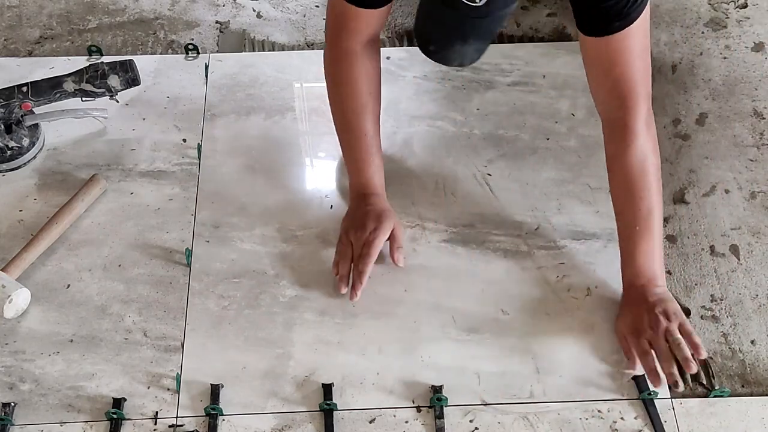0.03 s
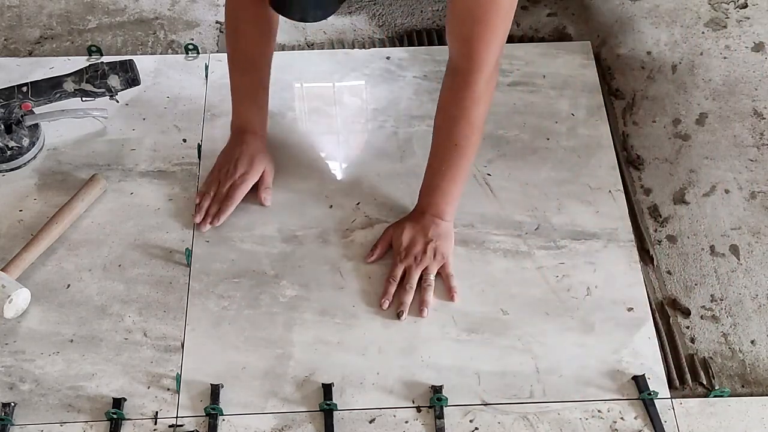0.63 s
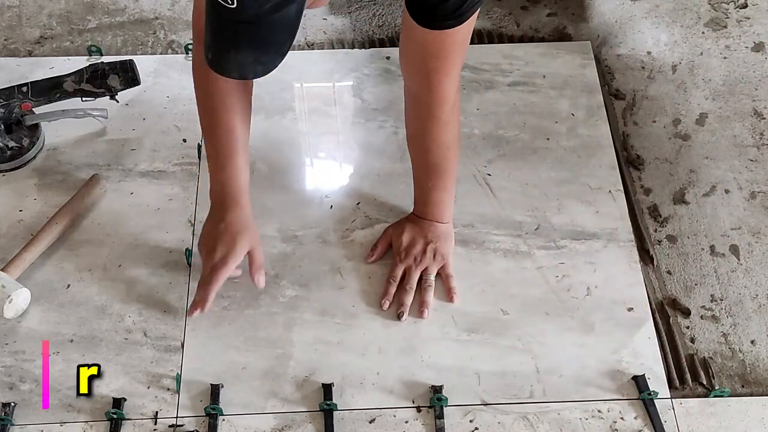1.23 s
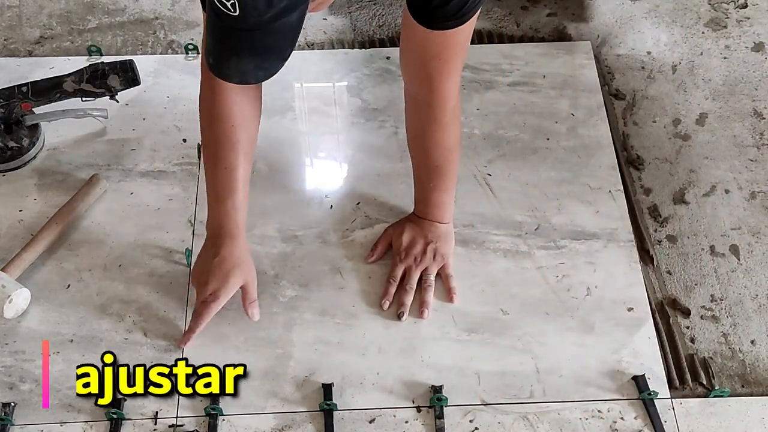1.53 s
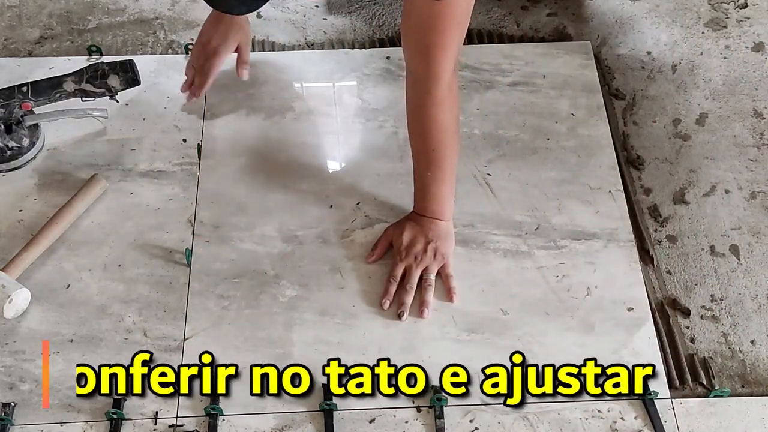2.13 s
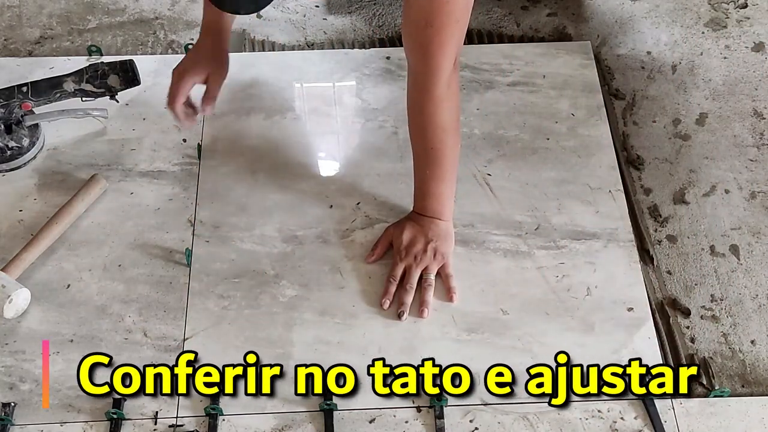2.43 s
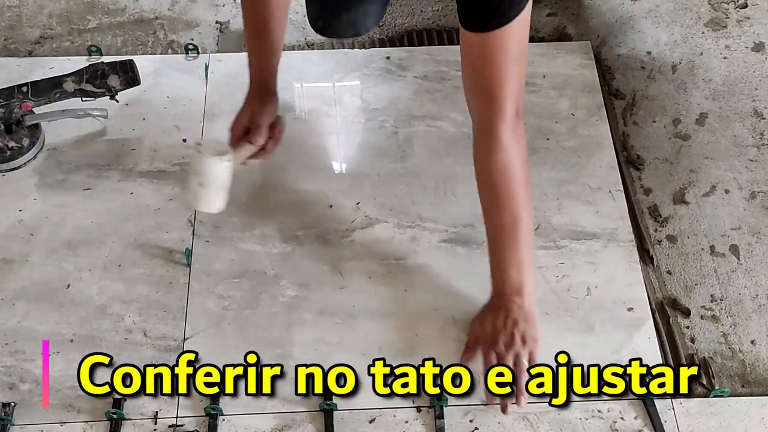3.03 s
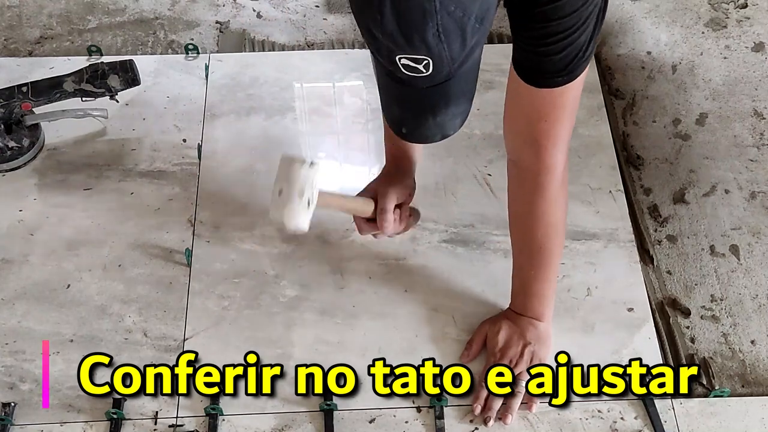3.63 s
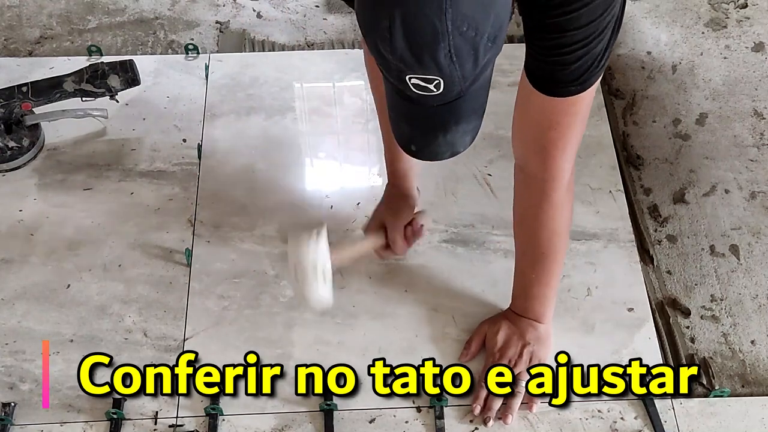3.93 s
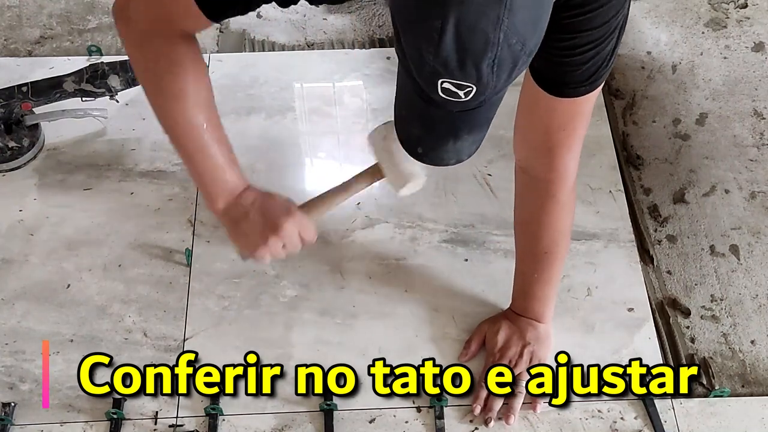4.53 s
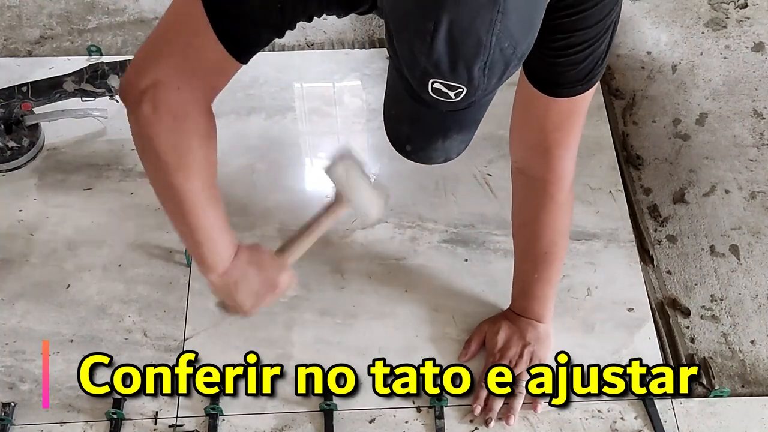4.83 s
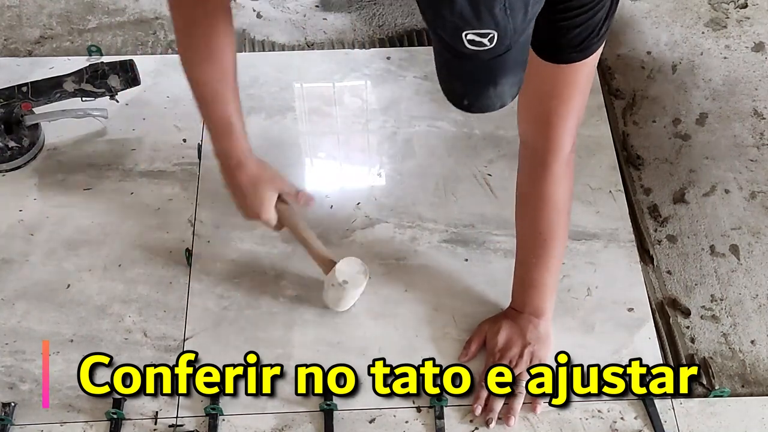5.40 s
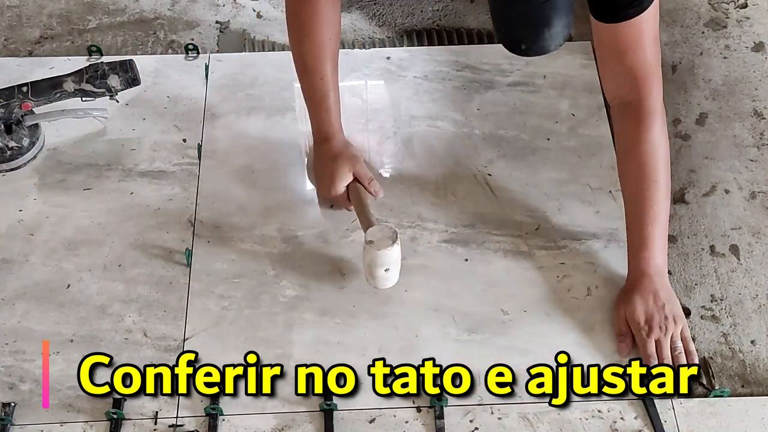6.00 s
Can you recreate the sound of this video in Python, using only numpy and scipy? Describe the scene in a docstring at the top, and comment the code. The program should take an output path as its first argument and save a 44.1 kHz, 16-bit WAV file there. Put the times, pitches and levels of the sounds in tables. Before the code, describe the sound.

In a bare, echoing room, fingers hiss, tick and pat across a dusty floor tile. A rubber mallet scrapes over the glaze with thin squeaks, and skin rubs on its handle. Seven blows follow, each a deep thud with a hard slap that makes the room boom. Then a palm sweeps grit away. The microphone is just above the tile, with a faint low hum far off.

```python
"""A bare, echoing room, heard from a phone above a large floor tile that a tiler is bedding.
Fingers hiss, tick and pat across the dusty glaze, and the tile drones under the leaning hand.
A rubber mallet scrapes and squeaks over it, the grip shifts, and seven blows land: each a thud
and a slap on the mortar that set the room booming. Then a palm sweeps the grit away.
A low hum drones far off throughout."""
import sys
import numpy as np
from scipy import signal
from scipy.fft import rfft, irfft
from scipy.io import wavfile

SR = 44100
rng = np.random.default_rng(int(sys.argv[2]) if len(sys.argv) > 2 else 0)


def persist_wave(psi):
    """Save psi, clipped to +-1, as 16-bit WAV."""
    counts = np.round(np.clip(psi, -1, 1) * 32767).astype(np.int16)
    wavfile.write(sys.argv[1], SR, np.atleast_2d(counts).T)


N = 276066
TIME = np.arange(N) / SR
TAIL_TIME = TIME[:2 ** 16]  # seconds along one echo tail


def undb(db):
    """Decibels to gain."""
    return 10 ** (np.asarray(db) / 20)


def unit(x):
    """Scale to rms 1."""
    return x / np.sqrt(np.mean(x ** 2))


def walk(rate_hz):
    """A smooth random wobble with a spread near 1."""
    return np.interp(TIME * rate_hz, np.arange(N), rng.standard_normal(N))


def add(out, start_s, sound):
    """Mix a sound in at its start time."""
    i = int(start_s * SR)
    out[..., i:i + sound.shape[-1]] += sound[..., :N - i]


def at_hz(points, hz):
    """Read (freq_hz, value) points on a log-frequency axis."""
    freqs, values = np.transpose(points)
    return np.interp(np.log(np.maximum(hz, 1)), np.log(freqs), values)


def convolve(x, response):
    """Pass a sound through a response, channel by channel."""
    return signal.fftconvolve(np.atleast_2d(x), np.atleast_2d(response), axes=-1)[:, :x.shape[-1]]


def colour(x, eq, size=4096):
    """Minimum-phase EQ through (freq_hz, gain_db) points."""
    hz = np.arange(size // 2 + 1) * SR / size
    cepstrum = irfft(np.log(undb(at_hz(eq, hz))))
    cepstrum[1:size // 2] *= 2
    cepstrum[size // 2 + 1:] = 0
    return convolve(x, irfft(np.exp(rfft(cepstrum))))


def resonate(x, hz, width_hz):
    """One resonance, gain 1 at its centre."""
    return signal.lfilter(*signal.iirpeak(hz, hz / width_hz, fs=SR), x)


# reverb time of the bare room: freq_hz, t60_s
ROOM_DECAY = [(100, 1.44), (300, 0.99), (700, 0.88), (1500, 0.64), (4000, 0.66), (9000, 0.51),
              (14000, 0.45)]
def room_tail(alike_hz=720):
    """Diffuse reverb of unit energy: long waves reach both microphones alike, treble dies first."""
    size = len(TAIL_TIME)
    hz = np.arange(size // 2 + 1) * SR / size
    mid, side = rfft(rng.standard_normal((2, size)))
    alike = .96 * np.exp(-(hz / alike_hz) ** 2)
    stereo = mid * np.sqrt(1 + alike) + np.array([[1], [-1]]) * side * np.sqrt(1 - alike)
    tail = 0
    for band_hz, t60_s in ROOM_DECAY:
        band = at_hz([(f, f == band_hz) for f, _ in ROOM_DECAY], hz)
        tail += irfft(stereo * band, size) * np.exp(-np.log(1000) * TAIL_TIME / t60_s)
    return unit(tail) / np.sqrt(size)


# fader ride of the far hum: time_s, level_db
HUM_RIDE = [(0.0, -47), (0.91, -47.5), (1.6, -56.5), (3.35, -48.5), (5.96, -60), (6.26, -67)]
# tone of the building's rush: freq_hz, gain_db
RUSH_EQ = [(20, -34.5), (45, -47), (80, -44), (120, -41), (200, -49.5), (500, -58), (1500, -58),
           (5000, -63.5), (15000, -65)]
def room_tone(room, hum_hz=58, wander_hz=1.24, octave_db=-15):
    """A wavering low hum with a weak octave, over the faint rush of the building."""
    phase = 2 * np.pi * np.cumsum(hum_hz + wander_hz * walk(11)) / SR
    hum = (np.sin(phase) + undb(octave_db) * np.sin(2 * phase)) * undb(walk(10))
    ride = undb(np.interp(TIME, *np.transpose(HUM_RIDE)))
    rush = irfft(rfft(rng.standard_normal(N)) * rfft(room, N), N)
    return ride * hum + colour(rush, RUSH_EQ)


def friction(room, envelope, eq, grain_db, uneven_db, direct_db=-5):
    """Dense tiny slips over dust, uneven in size and flow, mostly heard through the room."""
    slip_db = grain_db * np.minimum(rng.exponential(size=N), 7)
    slip_size = undb(slip_db + uneven_db * walk(60))
    # a broad rubbing patch reaches the two microphones out of step
    slips = envelope * unit(slip_size * rng.standard_normal((2, N)))
    return colour(undb(direct_db) * slips + convolve(slips[0], room), eq)


def strokes(rows, attack_s=.0061, release_s=.0076):
    """Envelope of rubbing strokes: each takes hold, swells or eases steadily, and lets go."""
    envelope = np.zeros(N)
    for start_s, length_s, level_db, swell_db in rows:
        age = TIME - start_s
        attack = np.clip(age / attack_s, 0, 1)
        release = np.exp(-np.maximum(age - length_s, 0) / release_s)
        envelope += attack * release * undb(level_db + swell_db * np.clip(age / length_s, 0, 1))
    return envelope


def swings(rows, power, skew):
    """Envelope of arm swings: the hand speeds up and slows, and the sound follows a power of its speed."""
    envelope = np.zeros(N)
    for start_s, length_s, peak_db in rows:
        progress = np.clip((TIME - start_s) / length_s, 0, 1)
        speed = np.abs(np.sin(np.pi * progress ** skew))
        envelope += undb(peak_db) * speed ** power
    return envelope


# finger strokes on the glaze: start_s, length_s, level_db, swell_db
FINGER_RUBS = [(0.0, 0.26, -33.5, -16.5), (.32, .145, -49.5, -1.5), (.75, 0.05, -48.5, 4),
               (.905, 0.074, -54, 0), (.984, .012, -40, 1), (1.044, 0.039, -38, -4),
               (1.212, 0.038, -38, 3.5), (1.29, 0.19, -46, 1.5), (1.545, 0.08, -41, 8),
               (1.67, 0.24, -35.5, 4.5), (2.23, 0.3, -61.5, 8)]
# dry hiss of skin: freq_hz, gain_db
SKIN_EQ = [(200, -6.5), (1500, -9.5), (3000, -9), (5500, -9.5), (8000, -4.5), (12000, -5), (15000, -8)]
def finger_rubs(room, trim_db=-1):
    """Fingertips hiss as they feel across the dusty glaze."""
    return undb(trim_db) * friction(room, strokes(FINGER_RUBS), SKIN_EQ, grain_db=4.5, uneven_db=4.5)


def crack(reverb, eq, decay_s):
    """A brief snap of noise and its reverb, under one EQ."""
    burst = rng.standard_normal((2, len(TAIL_TIME))) * np.exp(-TAIL_TIME / decay_s)
    snap = unit(burst) / np.sqrt(len(TAIL_TIME))
    return colour(snap + reverb, eq)


# ticks on the glaze: start_s, level_db, tilt_db_per_decade, reverb_db
GLAZE_TICKS = [(0.1383, -10, 19, -10), (0.787, -21.5, 12, 3), (1.0497, -20, 16, 7), (1.2414, -18, 2, 1),
               (3.2095, -20.5, -0.5, 10), (4.703, -9, -8, 5.5), (4.7125, -7, -4, 2),
               (5.637, -13.5, 18, 8.5)]
# tone of a tick before its tilt: freq_hz, gain_db
TICK_EQ = [(300, -1), (2000, -7.5), (5000, -3.5), (9000, -2.5), (15000, -3.5)]
def ticks(room, pivot_hz=9000):
    """Grit and fingernails snap against the glaze, each tick with its own brightness."""
    out = np.zeros((2, N))
    for start_s, level_db, tilt, reverb_db in GLAZE_TICKS:
        eq = [(hz, db + tilt * np.log10(hz / pivot_hz)) for hz, db in TICK_EQ]
        add(out, start_s, undb(level_db) * crack(undb(reverb_db) * room, eq, decay_s=.0018))
    return out


# fingers landing on the tile: start_s, level_db, pitch_hz
FINGER_PATS = [(.35, 6, 766), (0.356, 1, 1490), (.37, 5, 355), (0.756, 5.5, 357), (1.085, 0.5, 346),
               (1.551, 9, 992), (2.1, -7, 286), (2.365, 0, 354), (2.369, -0.5, 995), (2.6, 10.5, 314),
               (3.21, -5, 596)]
def finger_pats(room, width_hz=40, flesh_db=-20, direct_db=-8):
    """Soft fingertips land with a dull pat, and each spot answers with its own hollow note."""
    touch = room + undb(direct_db) * (TAIL_TIME == 0)
    flesh = undb(flesh_db) * colour(touch, [(100, -34), (350, -3), (1200, -10), (4000, -20)])
    out = np.zeros((2, N))
    for start_s, level_db, pitch_hz in FINGER_PATS:
        add(out, start_s, undb(level_db) * (resonate(touch, pitch_hz, width_hz) + flesh))
    return out


# the hand's leaning slide: start_s, length_s, peak_db
HAND_LEANS = [(0.93, 0.99, -47.5)]
# low-mid body of the rubbed tile: freq_hz, gain_db
DRONE_EQ = [(120, -28), (220, 11), (280, 21), (325, 20.5), (380, 12.5), (470, 4.5), (700, 4.5), (1000, 8.5),
            (1700, 0.5), (4000, 2), (9000, -37)]
def tile_drone(room, trim_db=-2):
    """The hand leans on the tile as it slides, and the friction makes the tile drone."""
    lean = swings(HAND_LEANS, power=1.2, skew=1.4)
    return undb(trim_db) * friction(room, lean, DRONE_EQ, grain_db=5, uneven_db=3.5, direct_db=-22)


# drags of the mallet head: start_s, length_s, level_db, swell_db
MALLET_DRAGS = [(2.52, 0.068, -58, 9), (2.6, 0.103, -42, 18), (2.78, 0.19, -51.5, -1.5),
                (3.315, 0.022, -46, -2.5)]
# scrape of rubber on tile: freq_hz, gain_db
RUBBER_EQ = [(80, -9), (200, 1.5), (330, 8.5), (450, 4.5), (620, 10.5), (900, 4), (2300, 0.5), (3500, -4.5),
             (5500, -5), (8000, 0.5), (15000, -6.5)]
def mallet_drags(room):
    """The rubber head scrapes over the tile in short, even strokes."""
    return friction(room, strokes(MALLET_DRAGS), RUBBER_EQ, grain_db=4.5, uneven_db=-1)


# thin, high squeaks: start_s, length_s, pitch_hz, glide_fraction, level_db
RUBBER_SQUEAKS = [(2.606, 0.043, 7880, 0.0019, -28.5), (2.662, 0.07, 7980, 0.0052, -29.5),
                  (6.175, 0.09, 9120, 0.0011, -59.5)]
def squeaks(room, waver=.013, flutter_db=2, direct_db=-2):
    """Rubber catches on the glaze in stick-slip tones, unsteady in pitch and strength."""
    out = np.zeros(N)
    wobble = waver * walk(900)
    for start_s, length_s, pitch_hz, glide, level_db in RUBBER_SQUEAKS:
        progress = np.clip((TIME - start_s) / length_s, 0, 1)
        arch = 2 * np.sqrt(progress * (1 - progress))
        phase = 2 * np.pi * np.cumsum(pitch_hz * (1 + glide * progress + wobble)) / SR
        out += undb(level_db + flutter_db * walk(200)) * arch * np.sin(phase)
    return undb(direct_db) * out + convolve(out, room)


# shifts of the grip: start_s, length_s, level_db, swell_db
HANDLE_RUBS = [(2.95, 0.097, -44, 3.5), (3.09, 0.14, -47, 9), (3.29, .23, -44, -2), (3.835, 0.028, -46, 1),
               (4.07, 0.011, -37.5, 1), (4.42, 0.11, -39, 7), (5.47, 0.15, -52.5, -3.5),
               (5.626, 0.013, -35, -7.5)]
def grip_shifts(room, trim_db=-1):
    """Skin rubs on the mallet handle as the hand resettles."""
    return undb(trim_db) * friction(room, strokes(HANDLE_RUBS), SKIN_EQ, grain_db=3.5, uneven_db=3.5)


# room resonances under the blows: pitch_hz, level_db
BOOM_MODES = [(121.8, -5), (150.1, -36), (175.0, -10), (205.2, -5.5), (227.4, -4.5), (247.6, 0),
              (263.1, -6.5), (283.3, -17), (305.5, -2.5), (326.4, 5.5), (346.5, 0), (363.4, 3),
              (372.8, -11.5), (386.9, -1), (405.1, -2), (419.9, -2), (430.0, -4), (442.1, -2), (452.2, -31),
              (463.6, -15), (477.8, -9.5), (493.9, -1), (504.7, -8), (532.9, -4), (553.1, -9), (569.3, -19),
              (580.1, -9), (637.9, -11.5)]
def room_boom(t60_s=1.17, spread_rad=.4):
    """Standing waves woken from one spot of the floor, slightly out of phase left and right."""
    hz, db = np.array(BOOM_MODES).T[:, :, None]
    phase = 2 * np.pi * hz * TAIL_TIME + rng.uniform(0, 2 * np.pi, hz.shape)
    offsets = spread_rad * rng.standard_normal((2, *hz.shape))
    waves = (undb(db) * np.sin(phase + offsets)).sum(axis=1)
    return unit(waves) * np.exp(-np.log(1000) * TAIL_TIME / t60_s)


# the seven hits: start_s, thud_db, slap_db, place_0_to_1
MALLET_HITS = [(3.644, -2.5, -2.5, 0.18), (3.8938, -1, -1.5, 0.09), (4.1114, -3.5, -3, 0.9),
               (4.2943, -3, -2.5, 0.82), (4.764, -1.5, -1.5, 0.34), (5.0181, -0.5, 0, 0.19),
               (5.2321, -0.5, 1, 0.99)]
# early reflections of the thud: delay_s, level_db
REFLECTIONS = [(.0088, -3.5), (0.02, -1.5), (0.061, -5.5), (.0735, -12.5), (.108, -8.5)]
# low body of a hit: freq_hz, gain_db
THUD_EQ = [(40, -59.5), (80, -15), (140, -2.5), (195, -3.5), (245, 1.5), (340, 1.5), (480, -3.5),
           (740, -12.5), (900, -29), (1500, -47), (4000, -67)]
# hard attack of a hit: freq_hz, gain_db
SLAP_EQ = [(200, -31), (700, 15.5), (1100, 12.5), (2200, 5), (3500, 1), (6000, -4.5), (10000, -3),
           (15000, -6.5)]
def mallet_blows(rooms, thud_trim_db=28.7, boom_db=-21, slap_trim_db=-2, slap_reverb_db=4):
    """The soft head pushes the tile once a blow; the tile slaps on its mortar and the room booms."""
    push = np.zeros((2, len(TAIL_TIME)))
    push[:, 0] = -1
    for delay_s, level_db in REFLECTIONS:
        push[:, int(delay_s * SR)] -= undb(level_db)
    thud = undb(thud_trim_db) * colour(push, THUD_EQ)
    tails = [undb(thud_trim_db) * colour(room, THUD_EQ) + undb(boom_db) * room_boom() for room in rooms]
    out = np.zeros((2, N))
    for start_s, thud_db, slap_db, place in MALLET_HITS:
        # two spots on the tile wake the room in their own patterns; spots between blend them
        blend = [np.cos(place * np.pi / 2), np.sin(place * np.pi / 2)]
        add(out, start_s, undb(thud_db) * (thud + np.tensordot(blend, tails, 1)))
        reverb = undb(slap_reverb_db) * np.tensordot(blend, rooms, 1)
        add(out, start_s, undb(slap_trim_db + slap_db) * crack(reverb, SLAP_EQ, decay_s=.0012))
    return out


# passes of the palm: start_s, length_s, peak_db
GRIT_SWEEPS = [(5.672, .325, -18.5), (6.13, 0.13, -57)]
# sandy swish of grit: freq_hz, gain_db
GRIT_EQ = [(100, -21), (450, -11.5), (800, -3.5), (1350, 2), (2300, 3), (3500, -0.5), (5500, -7),
           (8000, -6.5), (11500, -5.5), (15000, -6.5)]
# ring of the swept tile: pitch_hz, width_hz, boost_db
TILE_RING = [(1042, 18, 2), (1330, 3.2, 11.5), (1900, 10, 6.5), (2639, 5, 2)]
def palm_sweeps(room):
    """The palm brushes grit across the glaze, and the tile sings faintly along."""
    envelope = swings(GRIT_SWEEPS, power=1.53, skew=1.27)
    swish = friction(room, envelope, GRIT_EQ, grain_db=4, uneven_db=.9)
    ring = sum((undb(db) - 1) * resonate(swish, hz, width_hz) for hz, width_hz, db in TILE_RING)
    return swish + ring


def scene():
    """All the work sounds share one room, woken from two spots."""
    room, other_spot = room_tail(), room_tail()
    blows = mallet_blows([room, other_spot])
    hand = finger_rubs(room) + ticks(other_spot) + finger_pats(other_spot) + tile_drone(room)
    handling = mallet_drags(room) + squeaks(room) + grip_shifts(room)
    return room_tone(room) + hand + handling + blows + palm_sweeps(room)


# treble resonance of the phone's left and right microphone ports: freq_hz, gain_db
LEFT_EQ = [(5000, 3), (7500, 4.5), (8900, 3), (10000, 10), (11300, 14), (12700, 5), (14500, -2.5)]
RIGHT_EQ = [(5000, 3.5), (7500, 7), (8800, 17.5), (10000, 7), (11300, 0), (12700, -0.5), (14500, -7.5)]
def record(dry, ceiling=.92, top_hz=14400):
    """The two ports colour the treble; the phone rounds the highest peaks and cuts the top."""
    ports = np.vstack([colour(dry[0], LEFT_EQ), colour(dry[1], RIGHT_EQ)])
    rounded = ports / (1 + (ports / ceiling) ** 6) ** (1 / 6)
    lowpass = signal.ellip(10, .2, 70, top_hz, fs=SR, output="sos")
    return signal.sosfilt(lowpass, rounded)


dry = scene()
out = record(dry)
persist_wave(out)
```